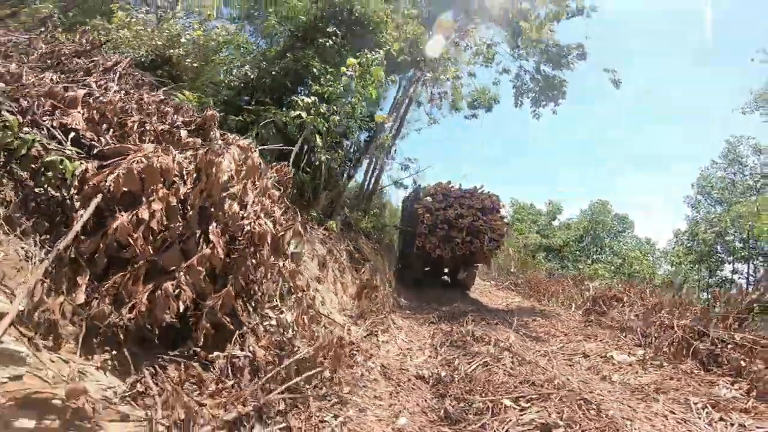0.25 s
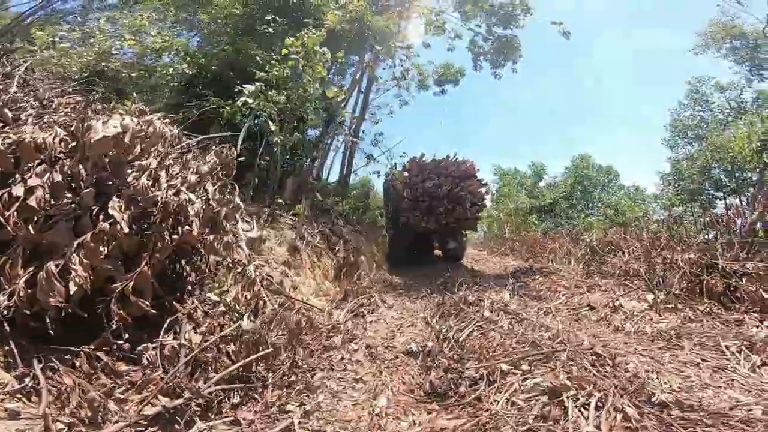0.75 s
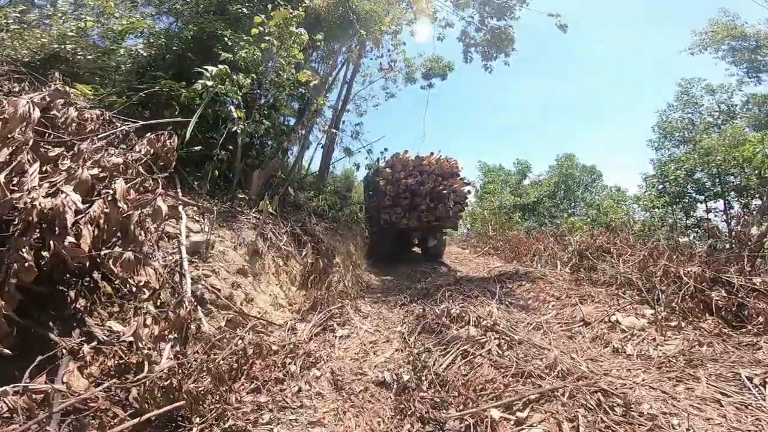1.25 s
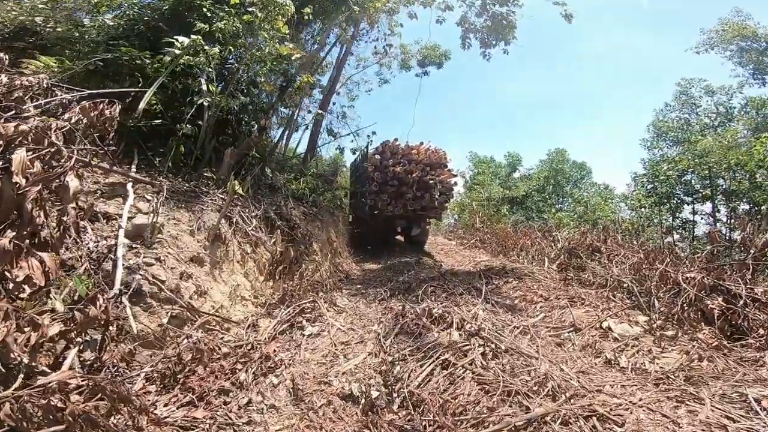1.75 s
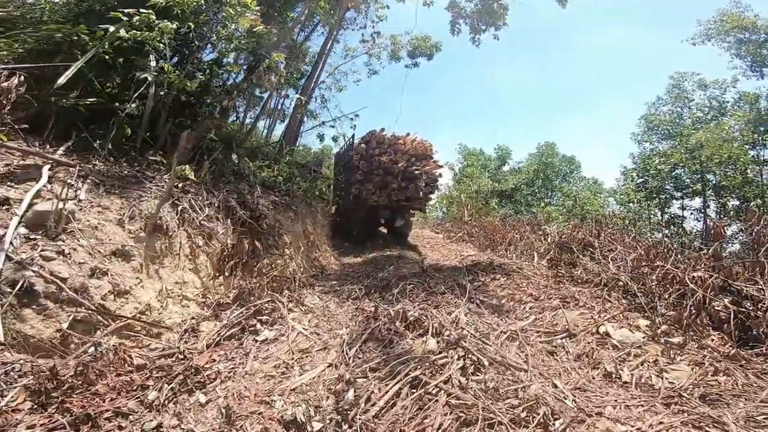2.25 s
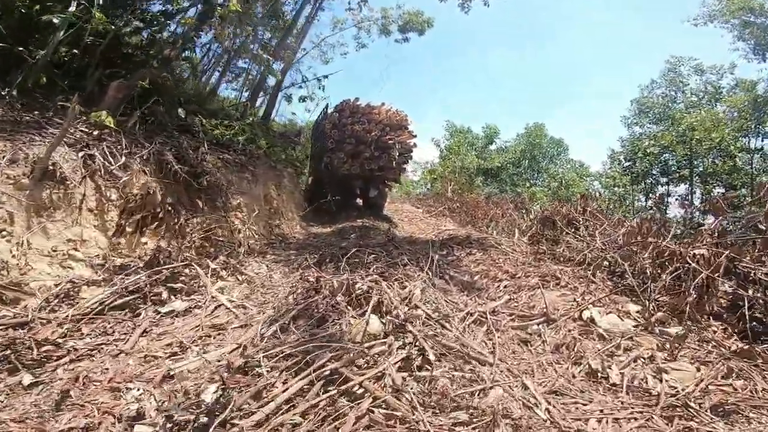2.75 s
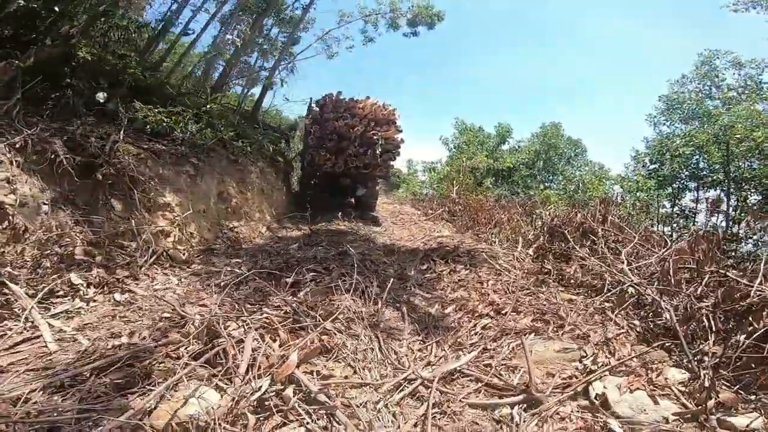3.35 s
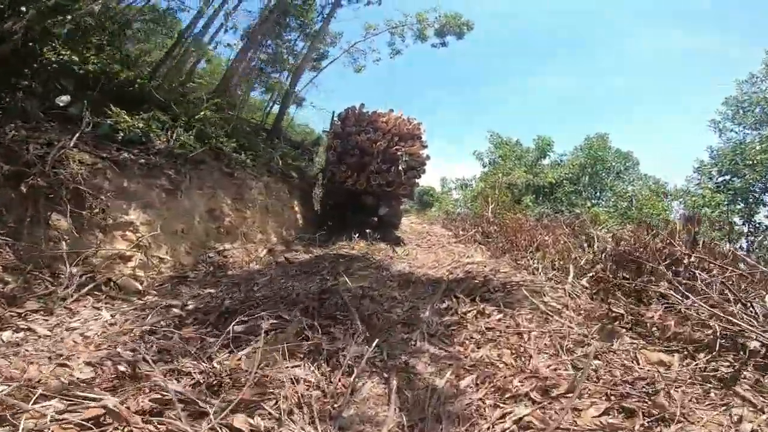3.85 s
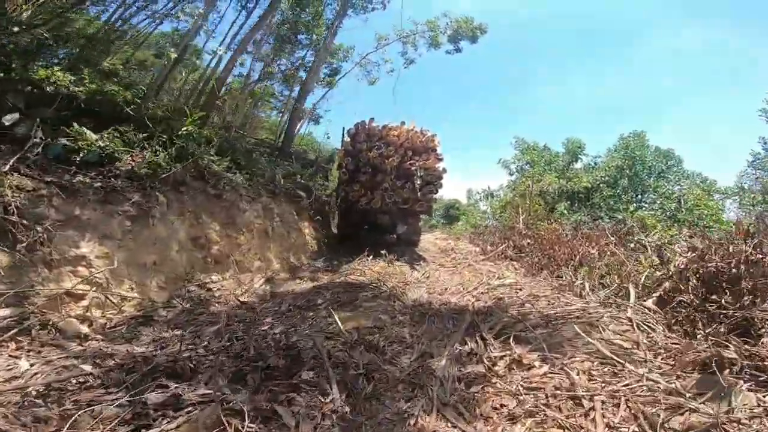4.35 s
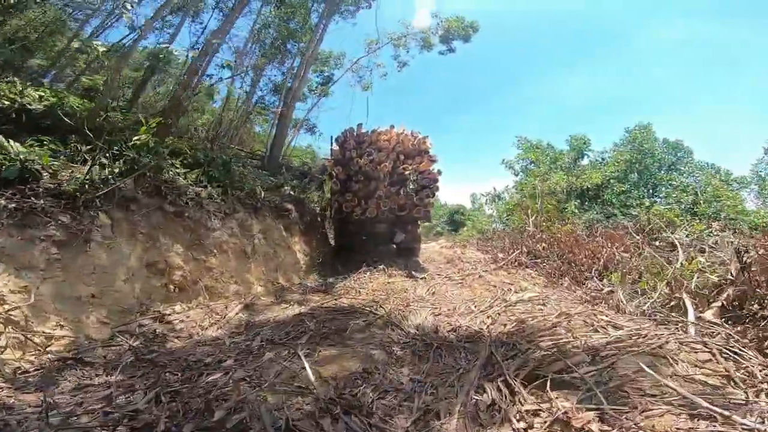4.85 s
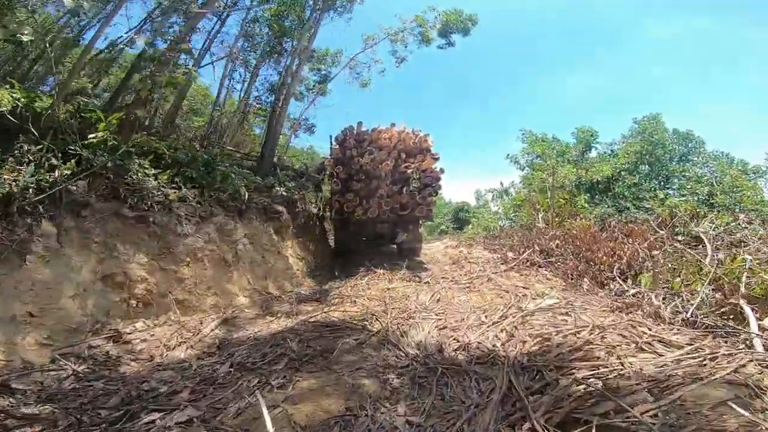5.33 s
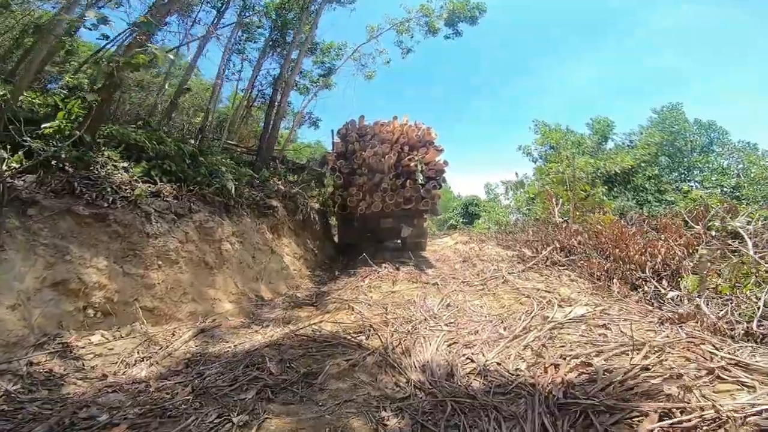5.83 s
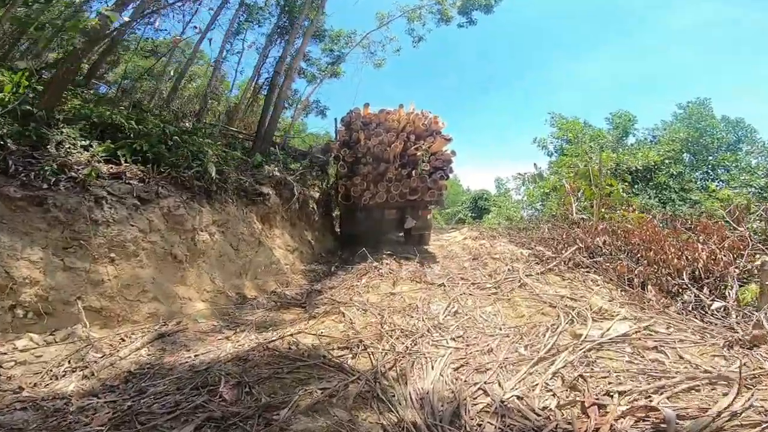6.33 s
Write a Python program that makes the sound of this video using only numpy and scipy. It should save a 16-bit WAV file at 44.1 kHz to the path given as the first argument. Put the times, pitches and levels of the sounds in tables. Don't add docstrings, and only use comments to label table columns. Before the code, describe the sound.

Deep throbbing diesel boom and metallic clatter hold steady as dry branches crack sharply nearby, thickest midway, over papery leaf rustle.

```python
import sys
import numpy as np
from scipy import signal
from scipy.io import wavfile
from scipy.ndimage import uniform_filter1d

SR = 44100
rng = np.random.default_rng(int(sys.argv[2]) if len(sys.argv) > 2 else 0)


def master(y):
    cut = np.clip(np.atleast_2d(y).T, -1, 1)
    pcm = np.round(cut * 32767)
    wavfile.write(sys.argv[1], SR, pcm.astype(np.int16))


def convert_level_to_amplitude(level_db):
    exponent = np.asarray(level_db, float) / 20
    return 10 ** exponent


N = 290617


def rms_one(x):
    return x / np.sqrt(np.mean(x ** 2) + 1e-20)


def in_time(rows):
    s, *columns = np.transpose(rows)
    return [np.interp(np.arange(N) / SR, s, c) for c in columns]


def peaks_db(rows, rise_db_per_s, fall_db_per_s, rest_db):
    t = np.arange(N) / SR
    levels = []
    for s, db in rows:
        slope = np.where(t < s, rise_db_per_s, fall_db_per_s)
        levels.append(np.maximum(db - slope * np.abs(t - s), rest_db))
    return np.max(levels, axis=0)


def at_hz(points, hz):
    f, value = np.transpose(points)
    return np.interp(np.log(hz), np.log(f), value)


def drift(rate):
    r = np.exp(-80 * np.pi * rate / SR)
    slow = signal.lfilter([1], [1, -2 * r, r * r], rng.standard_normal(N // 40 + 2002))[2000:]
    return np.interp(np.arange(N) / 40, np.arange(len(slow)), rms_one(slow))


def low_pass(x, hz, order):
    return signal.sosfilt(signal.butter(order, hz, fs=SR, output="sos"), x)


def band_pass(x, low_hz, high_hz, order):
    return signal.sosfilt(signal.butter(order, [low_hz, high_hz], "band", fs=SR, output="sos"), x)


def resonance(x, hz, width_hz):
    r = np.exp(-np.pi * width_hz / SR)
    b = [(1 - r * r) / 2, 0, (r * r - 1) / 2]
    return signal.lfilter(b, [1, -2 * r * np.cos(2 * np.pi * hz / SR), r * r], x)


def grains(share, spread_db):
    sizes = convert_level_to_amplitude(spread_db * np.minimum(rng.exponential(1, (2, 1, N)), 6))
    sizes = sizes * (rng.random((2, 1, N)) < share)
    return rng.standard_normal((2, 2, N)) * sizes + 1e-9


def coloured(source, spectrum, patchy_db, alike_share=1):
    # f/Hz, likeness [0-1]
    likeness = [(400, 0.98), (700, 0.96), (1300, 0.87), (3000, 0.92), (4300, 0.96), (5500, 0.57),
                (8000, 0.24), (15000, 0.05)]
    lowest, highest = spectrum[0][0], spectrum[-1][0]
    edges = np.geomspace(lowest, highest, round(3 * np.log2(highest / lowest)) + 1)
    out, together = 0, drift(5.2)
    for k, (low, high) in enumerate(zip(edges, edges[1:])):
        mid, side = band_pass(source[k % 2], low, high, order=2)
        hz = np.sqrt(low * high)
        alike = np.clip(alike_share * at_hz(likeness, hz), 0, 1)
        gain = convert_level_to_amplitude(at_hz(spectrum, hz) + patchy_db * (0.91 * together + drift(27.4)))
        out = out + gain * (np.sqrt(1 + alike) * mid + np.sqrt(1 - alike) * side * [[1], [-1]])
    return out / np.std(out.mean(axis=0))


def pan(db):
    return convert_level_to_amplitude(np.array([[db / 2], [-db / 2]]))


def exhaust(cycles, half_db, firing_db, third_db, octave_db):
    # crank angle [0-720 degrees], level/dB
    cylinders = [(37.7, 0), (123.7, -4.8), (216.7, -1.9), (310.2, -3), (402.6, 4.6), (484.9, -.3),
                 (585.4, 3.1), (666.1, -2.4)]
    # f/Hz, width/Hz, level/dB
    pipe = [
        (76.8, 31, -27.1),
        (150, 67.8, -34.9),
        (236.9, 15, -48.6),
    ]
    puffs = np.zeros(N)
    for angle, db in cylinders:
        at = np.flatnonzero(np.diff(np.floor(cycles - angle / 720)) > 0)
        puffs[at] = convert_level_to_amplitude(db + 0.073 * rng.standard_normal(120)[:len(at)])
    puffs = puffs * SR / 15.55 / 2
    boom = 0
    for k, (hz, width_hz, db) in enumerate(pipe):
        boom = boom + (-1) ** (k + 1) * convert_level_to_amplitude(db) * resonance(puffs, hz, width_hz)
    boom = low_pass(boom, 1000, order=2)
    boom = boom + (convert_level_to_amplitude(half_db - firing_db + 12.5) - 1) * resonance(boom, 62.0, 22)
    boom = boom + (convert_level_to_amplitude(third_db - firing_db + 19.0) - 1) * resonance(boom, 187.5, 7.9)
    boom = boom + (convert_level_to_amplitude(octave_db - firing_db + 29.0) - 1) * resonance(boom, 243.7, 22)
    return convert_level_to_amplitude(firing_db + 17.5) * boom


def rumble(cycles, db, panels_db):
    # f/Hz, level/dB per Hz
    turbulence = [(25, -27.5), (45, -8.5), (100, 0.5), (200, -3.5), (300, -18), (500, -15.5), (760, -20),
                  (900, -31.5)]
    # f/Hz, width/Hz, level/dB
    body = [(316, 10, -6), (475, 9, 4), (605.4, 9.5, 4), (694, 14, 0.5), (746, 13, -4.5)]
    flow = coloured(rng.standard_normal((2, 2, N)), turbulence, patchy_db=.8)
    drumming = sum(convert_level_to_amplitude(g - 2 + panels_db) * resonance(flow, hz, width_hz) for hz, width_hz, g in body)
    swell_db = 0.45 * np.cos(8 * np.pi * cycles + 0.62)
    return convert_level_to_amplitude(db + 4.0 + swell_db) * low_pass(flow + drumming, 808, order=8)


def clatter(cycles, db):
    # f/Hz, level/dB per Hz
    ticking = [(700, -13), (1000, 0.5), (1500, 2), (2000, 0.5), (2900, 1), (3500, -0.5), (4100, -2),
               (5000, -5)]
    # f/Hz, width/Hz, level/dB
    block = [(1038, 79, 1.5), (1730, 99, -7.5), (2934, 170, -2), (3950, 280, -3)]
    knock_db = 0.6 * np.cos(4 * np.pi * cycles) + 1.1 * np.cos(8 * np.pi * cycles)
    metal = coloured(grains(1.0, 1.6), ticking, patchy_db=0.73)
    metal = metal + sum(convert_level_to_amplitude(g) * resonance(metal, hz, width_hz) for hz, width_hz, g in block)
    return convert_level_to_amplitude(db - 3.0 + knock_db) * low_pass(metal, 4620, order=8)


def cab_and_gears(gear_db):
    # t/s, level/dB
    jolts = [
        (.29, -39.5),
        (.92, -44),
        (1.8, -36),
        (2.12, -35.5),
        (3.4, -60),
        (4.72, -38.5),
        (5.38, -39),
        (5.6, -42),
        (5.8, -39.5),
    ]
    cab_db = peaks_db(jolts, rise_db_per_s=59, fall_db_per_s=50, rest_db=-58.5)
    shake = rng.standard_normal((2, N))
    cab = rms_one(resonance(resonance(shake[0], 405.5, 13), 405.5, 13))
    gear = rms_one(resonance(resonance(shake[1], 786, 17), 786, 17))
    return convert_level_to_amplitude(cab_db - 3.5) * cab + convert_level_to_amplitude(gear_db - 4.5) * gear


def snaps():
    # t/s, peak level/dB, ring f/Hz, bright crack against ring/dB, left minus right/dB
    twigs = [(.129, -20.5, 2550, -13, -2), (0.314, -21, 2770, -13, -1.5), (.532, -18, 3900, -14, 2.5),
             (0.5626, -10.5, 3100, -15, -9), (0.589, -14, 1670, -17, -6), (1.5762, -29.5, 1580, 0, 9),
             (1.655, -26, 3270, -10, 4), (1.8093, -24, 2980, -28, 4), (2.2202, -28, 1700, -3, -9),
             (2.426, -12, 2000, -20, -8.5), (2.5153, -24.5, 3950, -16, 2), (2.934, -27.5, 2300, 7.5, -5),
             (2.998, -26, 1530, 1, -6), (3.033, -22, 3090, 6, -6), (3.149, -18, 2110, -8, 3),
             (3.329, -12.5, 2930, -17, -7), (3.3953, -25.5, 1520, -16, 4), (3.604, -13.5, 1940, -25, -13),
             (3.631, -9, 4290, 4, -6), (4.1627, -24, 4030, -23, 2), (5.0631, -21.5, 2310, -16, -9),
             (5.5834, -23.5, 1970, -31, 2), (6.2304, -23, 3100, -5, -6)]
    # t/s, peak level/dB, ring f/Hz, left
    # minus right/dB, ring time/ms
    faint_crack_breaks = [(.485, -27, 240, 5, 9.0), (.513, -19, 320, -2, 5.0), (.605, -20, 520, -3, 4.7),
                          (1.790, -17.5, 2330, .6, 1.6), (2.3261, -18.5, 1960, -7, 1.7),
                          (2.364, -19.5, 2040, -1, 1.5), (2.467, -20, 830, -4, 3.3), (2.5449, -14, 2820, -0.5, 3.2),
                          (3.129, -8, 1763, -5.5, 3.5), (3.488, -18.5, 720, 4.5, 3.7), (3.6313, -11, 2000, -7.5, 1.3)]
    twig_ring_ms, faint_crack_db = 1.7, -38
    breaks = [(*row, twig_ring_ms) for row in twigs]
    breaks += [(s, db, hz, faint_crack_db, lr_db, ms) for s, db, hz, lr_db, ms in faint_crack_breaks]
    out, t = np.zeros((2, N)), np.arange(1500) / SR
    for s, db, hz, crack_db, lr_db, ms in breaks:
        fade = np.minimum(t / .0003, 1) * np.exp(-t * 1000 / ms)
        burst = rng.standard_normal((3, len(t))) * fade
        splinters = resonance(burst[0] + .5 * burst[1:], hz, 0.6 * hz)
        splinters = resonance(splinters, 0.61 * hz, 2.4 * hz)
        ring = fade * np.sin(2 * np.pi * hz * t) + 1.1 * splinters / np.abs(splinters).max()
        crack = band_pass(burst[0] + 1.3 * burst[1:], 3800, 10500, order=4)
        both = ring / np.abs(ring).max() + convert_level_to_amplitude(crack_db) * crack / np.abs(crack).max()
        i = round(s * SR)
        out[:, i:i + len(t)] += convert_level_to_amplitude(db - 5.0) * pan(lr_db) * both
    return out


def crunches():
    # f/Hz, level/dB per Hz
    crushed = [(350, -33), (600, -19.5), (1050, -5.5), (2990, -8), (7140, -13.5), (8400, -9), (13900, -27),
               (15500, -38)]
    # peak t/s, level/dB, rise/s, fall/s, treble/dB
    heaps = [(.021, -32.5, 0.033, 0.019, 1.5), (.527, -35, 0.0023, 0.016, 8), (0.556, -25, 0.013, .012, 2),
             (.6, -35.5, 0.07, .16, -3.5), (1.45, -40, 0.013, 0.14, -4), (1.98, -40, .01, 0.031, -4.5),
             (2.14, -40, 0.013, 0.05, -21), (2.252, -34.5, .011, 0.013, -5.5),
             (2.38, -35.5, 0.072, 0.016, -7), (2.422, -29, .0028, 0.01, -7),
             (3.035, -32.5, .035, .034, -3.5), (3.16, -50, .014, 0.025, 7.5),
             (3.291, -28.5, 0.0044, 0.0055, 3.5), (3.363, -30.5, 0.037, 0.014, 1),
             (3.4, -38.5, .02, 0.033, 4), (3.5, -35.5, 0.013, 0.041, -6.5),
             (3.602, -26, 0.035, 0.023, -0.5), (3.731, -44, 0.0054, .015, 9),
             (4.01, -31.5, .013, .018, -6.5), (5.063, -39, .0035, .0088, 5.5),
             (5.92, -34.5, .0058, 0.014, -6), (6.454, -43, 0.0049, 0.011, 3)]
    t, low_level, high_level = np.arange(N) / SR, 0, 0
    crackle = coloured(grains(0.22, 2.2), crushed, patchy_db=-1.8, alike_share=0.91)
    crackle = low_pass(crackle, 10000, order=2)
    stalks = low_pass(crackle, 4500, order=2)
    for s, db, rise, fall, treble_db in heaps:
        shape = np.exp(-np.abs(t - s) / np.where(t < s, rise, fall))
        swell = convert_level_to_amplitude(db) * pan(-3) * shape
        low_level = low_level + swell
        high_level = high_level + convert_level_to_amplitude(treble_db) * swell
    return low_level * stalks + high_level * (crackle - stalks)


def rustle():
    # f/Hz, level/dB per Hz
    papery = [(900, -11), (2500, -1), (5000, -3), (7000, 2.5), (8200, -3.5), (9700, -15), (14000, -17),
              (15500, -34)]
    # t/s, level/dB
    stirring = [(0, -38), (.27, -44), (.55, -47.5), (.66, -46.5), (.83, -50), (1.23, -56), (1.52, -61),
                (2.03, -59), (2.33, -51.5), (2.75, -52.5), (2.97, -48), (3.14, -44), (3.47, -49.5),
                (3.56, -45), (4.4, -44.5), (4.64, -47.5), (6.59, -44.5)]
    db = in_time(stirring)[0]
    leaves = coloured(grains(0.97, 3.2), papery, patchy_db=0.83)
    leaves = leaves + convert_level_to_amplitude(-10.5) * resonance(leaves, 6900, 500) + convert_level_to_amplitude(-31.0) * resonance(leaves, 11400, 400)
    return convert_level_to_amplitude(db + 1.67) * (leaves + convert_level_to_amplitude(6.5) * low_pass(leaves, 10540, order=8)) / 2.12


def wind():
    # t/s, level/dB
    gust = [(.15, -42), (.24, -50), (.5, -28), (.61, -39), (3.62, -43), (4.6, -50), (4.77, -52),
            (5.34, -47.5), (5.6, -48), (5.74, -48), (6.03, -52)]
    lumps = rng.standard_normal((2, N)) * convert_level_to_amplitude(3.3 * drift(25))
    low = rms_one(band_pass(lumps, 50, 300, order=3))
    puff_db = peaks_db(gust, rise_db_per_s=334, fall_db_per_s=222, rest_db=-76)
    return convert_level_to_amplitude(puff_db) * (low[0] * [[1], [-1]] + 0.71 * low[1])


def treetops():
    hiss = band_pass(rng.standard_normal((2, N)), 7000, 14000, order=1)
    return convert_level_to_amplitude(-73) * rms_one(hiss)


def scattered(x, ripple_db):
    cells = signal.stft(x, nperseg=1024)[2]
    field = rng.standard_normal(cells.shape[1:])
    field = uniform_filter1d(field, size=2, axis=0)
    field = uniform_filter1d(field, size=7, axis=1)
    return signal.istft(cells * convert_level_to_amplitude(ripple_db * rms_one(field)), nperseg=1024)[1][:, :N]


def scene():
    # t/s, speed [four-stroke cycles per s], load as firing tone level/dB
    engine = [(0, 14.93, -18.9), (.45, 15.26, -18.5), (.68, 15.46, -16.2), (.85, 15.37, -15),
              (1.3, 15.36, -16.2), (1.65, 15.7, -16.7), (2.05, 15.97, -18.6), (2.3, 15.65, -17.5),
              (2.58, 14.97, -16.8), (3.15, 15.42, -17.5), (3.65, 16.02, -18.8), (4.13, 15.65, -19.2),
              (4.62, 15.77, -17.7), (4.95, 15.46, -18.1), (5.27, 14.99, -17.7), (5.7, 15.87, -19.5),
              (6.3, 16.0, -18.2), (6.59, 15.05, -18.6)]
    # t/s, share [0-1]
    pipe_turn = [(0, 0.75), (.4, 0.33), (1.25, 0.58), (1.7, .4), (2.65, 0.18), (3.2, 0.62), (3.7, 0.77),
                 (4.3, 0.85), (5.2, 0.98), (6.2, 0.72), (6.59, 0.78)]
    per_s, firing_db = in_time(engine)
    facing = in_time(pipe_turn)[0]
    faster = per_s - 15.55
    harder = firing_db + 18
    cycles = np.cumsum(per_s) / SR

    half_db = -24 - 6.5 * facing - 0.3 * harder
    third_db = -38 - 17.5 * faster - 0.5 * facing + 0.45 * harder
    octave_db = -55.5 - 2.5 * faster + 20.5 * facing - 0.4 * harder
    gear_db = -57.5 + 7.5 * faster + 6 * drift(4.2)
    boom = exhaust(cycles, half_db, firing_db, third_db, octave_db) + cab_and_gears(gear_db)
    boom = boom + convert_level_to_amplitude(-59 + 3 * harder + 10.5 * faster) * np.sin(40 * np.pi * cycles)
    boom = boom - convert_level_to_amplitude(octave_db - 7 + 5.5 * faster) * np.sin(30 * np.pi * cycles)

    rumble_db = -39 + 3 * facing + 0.5 * faster - 0.11 * harder
    clatter_db = -44.5 + 2 * facing + 0.2 * faster
    beds = rumble(cycles, rumble_db, panels_db=4.5 * facing) + clatter(cycles, clatter_db)
    beds = beds + rustle() + treetops()
    beds = scattered(low_pass(beds, 14700, order=8), ripple_db=3.0)
    return boom + beds + crunches() + snaps() + wind()


def gated(side, mid, under_db, waver_db):
    hz, _, (s, m) = signal.stft(np.array([side, mid]), SR, nperseg=2048)
    band = np.digitize(hz, np.geomspace(250, 16000, 40))
    member = band == np.arange(band.max() + 1)[:, None]
    ratio = (member @ np.abs(s) ** 2) / (member @ np.abs(m) ** 2 + 1e-20)
    limit = convert_level_to_amplitude(2 * (under_db + waver_db * rng.standard_normal(ratio.shape)))
    return signal.istft(s * (ratio > limit)[band], nperseg=2048)[1][:N]


def band_limit(x):
    return signal.sosfilt(signal.butter(12, 15670, fs=SR, output="sos"), x)


def record(dry):
    # t/s, level/dB
    width = [
        (0, 8.5),
        (.68, 6),
        (.75, -1),
        (1.2, -6),
        (2.0, -37),
        (2.15, -4.5),
        (2.55, -5),
        (3.0, 2.5),
        (6.59, 4.5),
    ]
    mid, side = (dry[0] + dry[1]) / 2, (dry[0] - dry[1]) / 2
    width_db = in_time(width)[0]
    low = low_pass(side, 4500, order=2)
    side = convert_level_to_amplitude(width_db) * low + convert_level_to_amplitude(.6 * width_db) * (side - low)
    side = gated(side, mid, under_db=-15, waver_db=2.5)
    mix = low_pass(np.array([mid + side, mid - side]), 15600, order=12)
    return band_limit(mix)


dry = scene()
out = record(dry)
master(out)
```